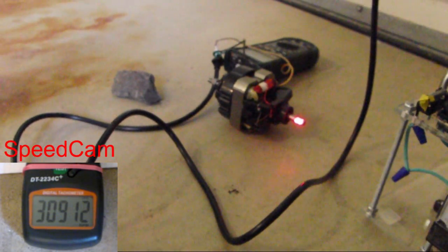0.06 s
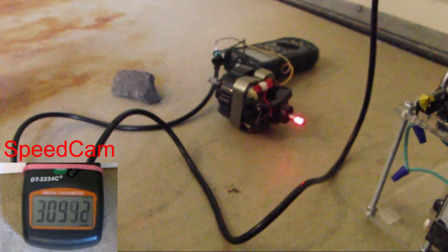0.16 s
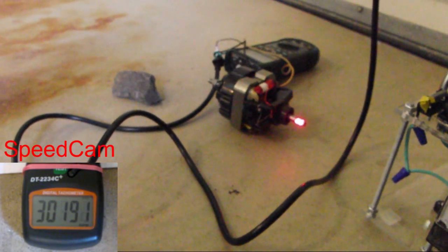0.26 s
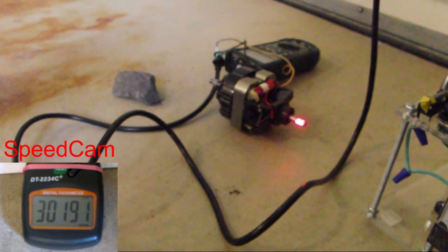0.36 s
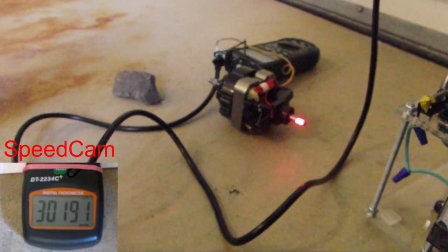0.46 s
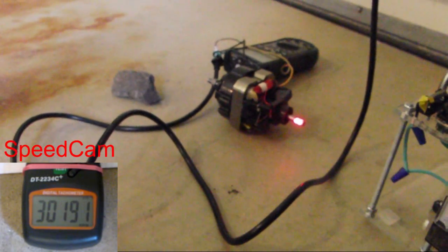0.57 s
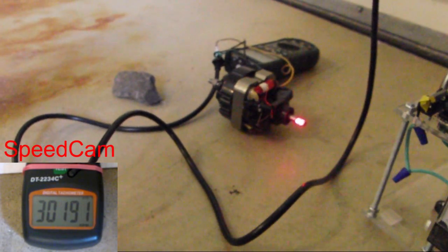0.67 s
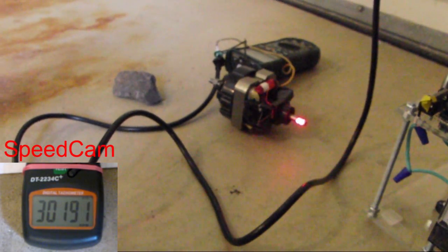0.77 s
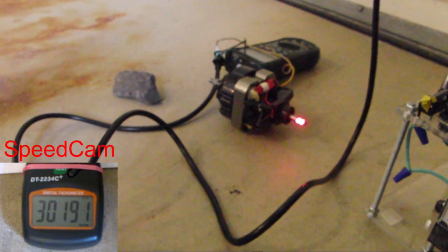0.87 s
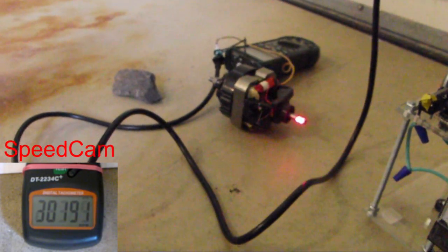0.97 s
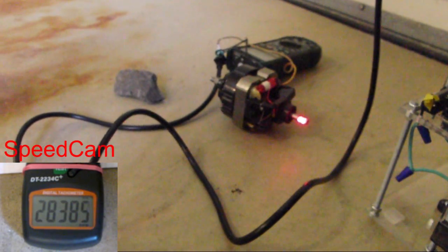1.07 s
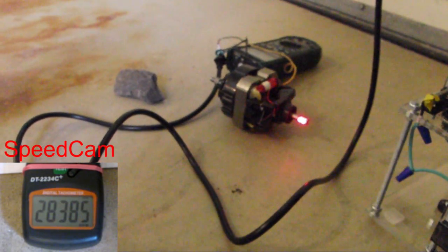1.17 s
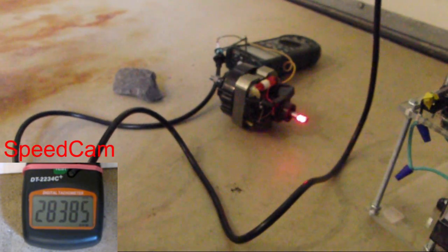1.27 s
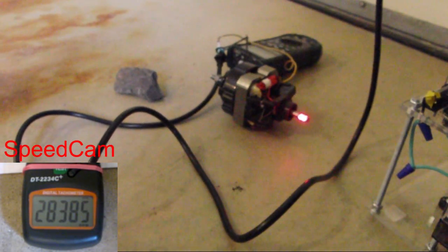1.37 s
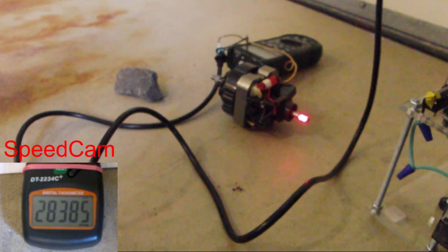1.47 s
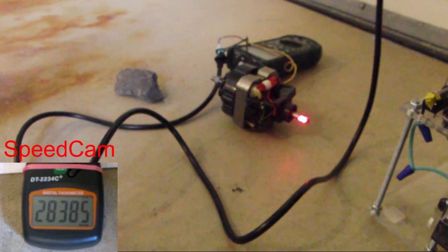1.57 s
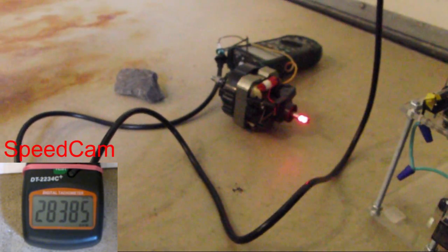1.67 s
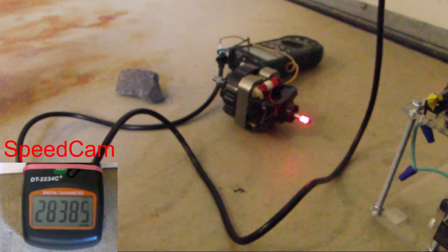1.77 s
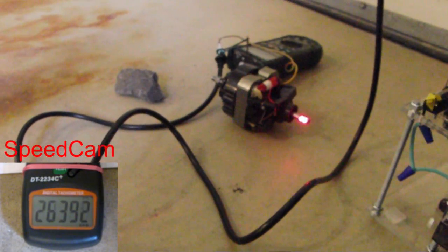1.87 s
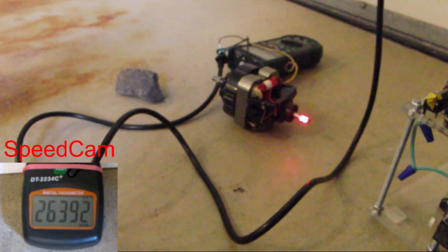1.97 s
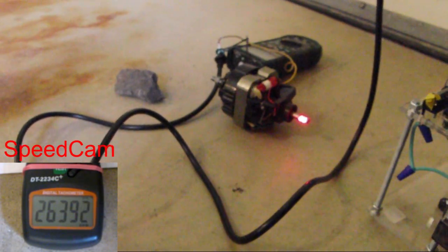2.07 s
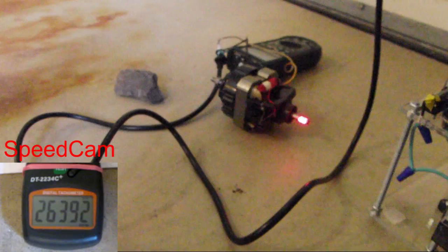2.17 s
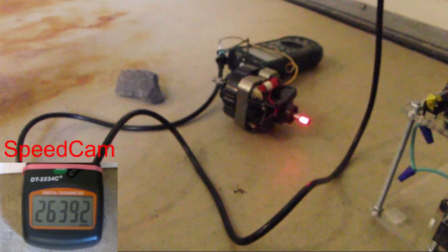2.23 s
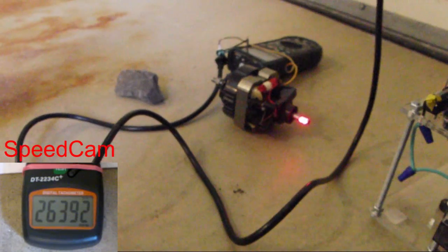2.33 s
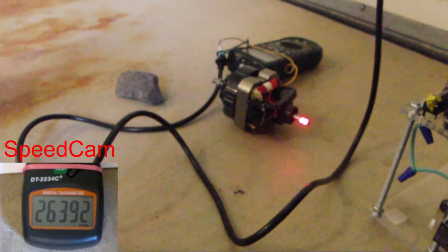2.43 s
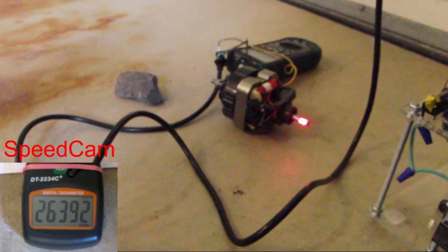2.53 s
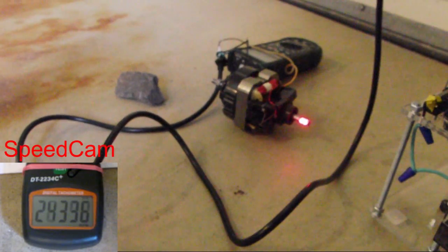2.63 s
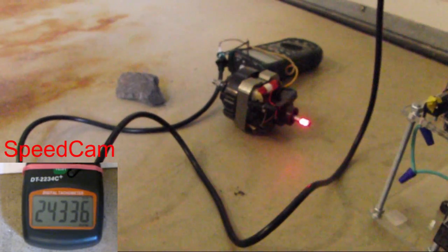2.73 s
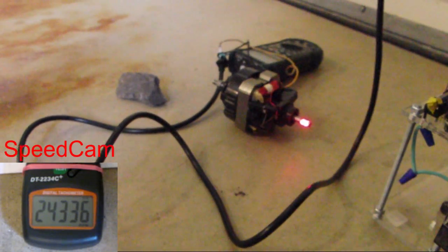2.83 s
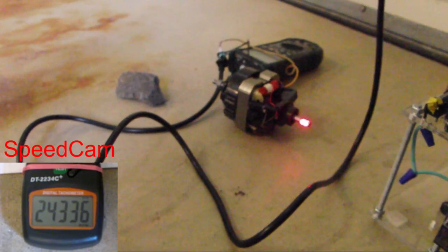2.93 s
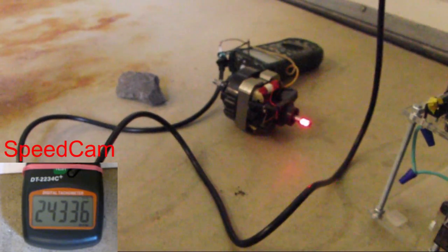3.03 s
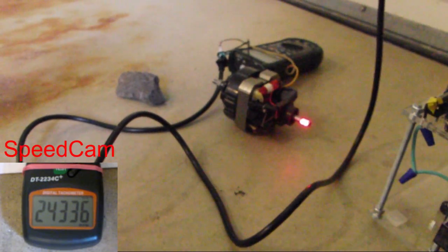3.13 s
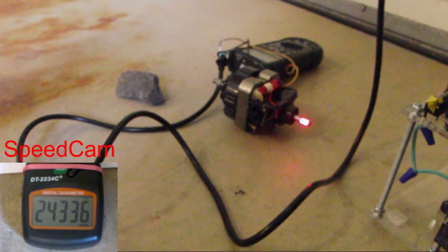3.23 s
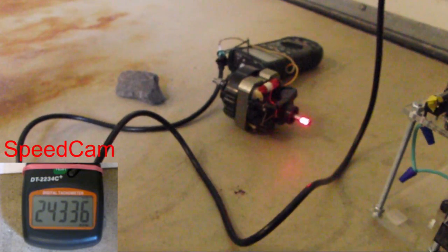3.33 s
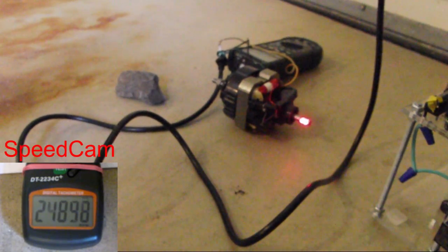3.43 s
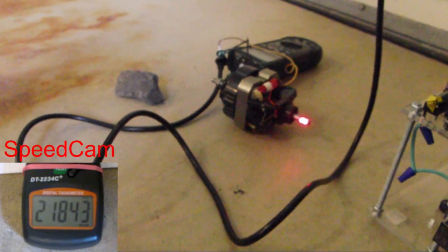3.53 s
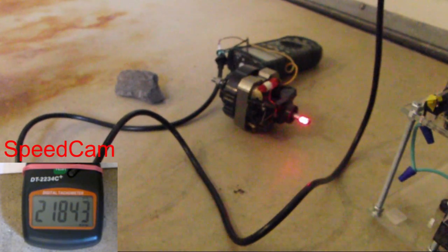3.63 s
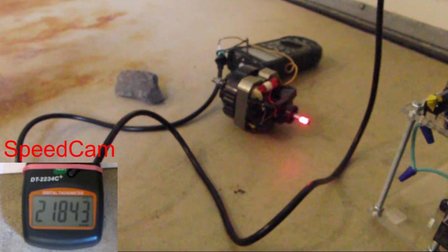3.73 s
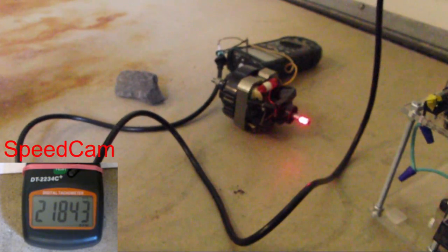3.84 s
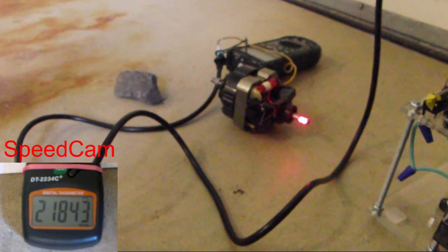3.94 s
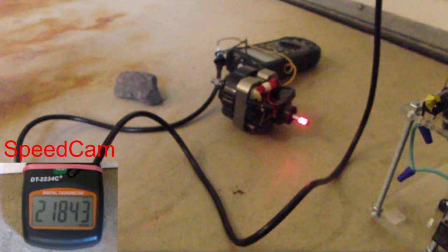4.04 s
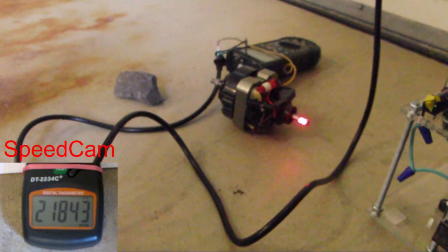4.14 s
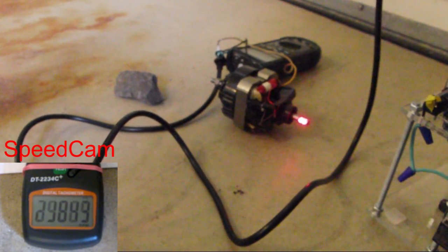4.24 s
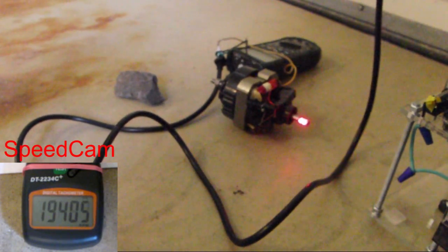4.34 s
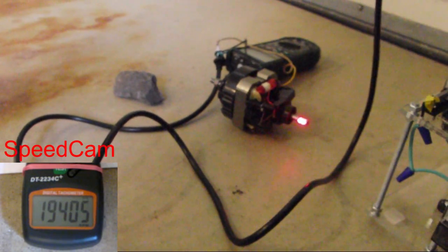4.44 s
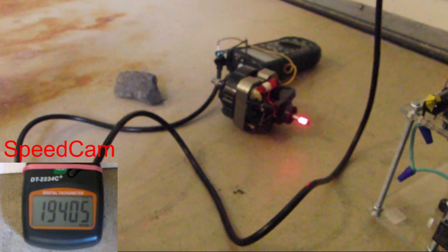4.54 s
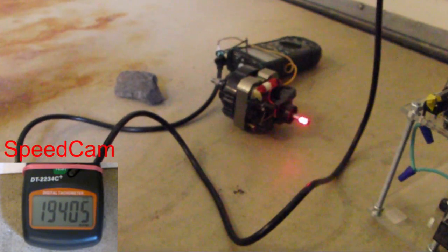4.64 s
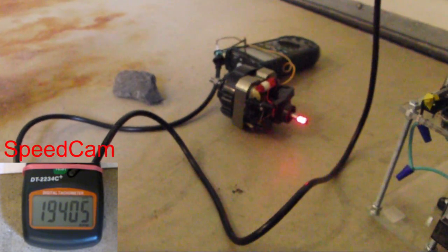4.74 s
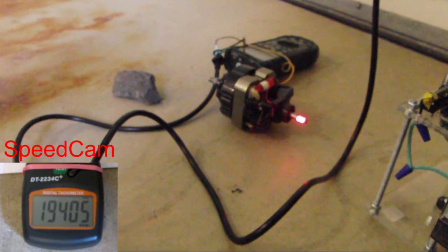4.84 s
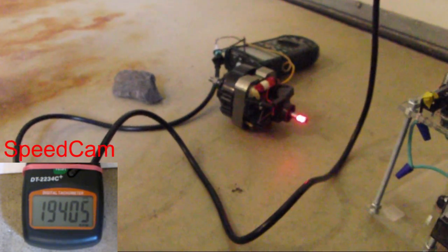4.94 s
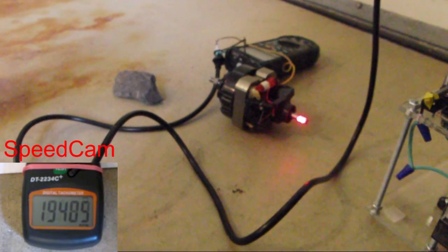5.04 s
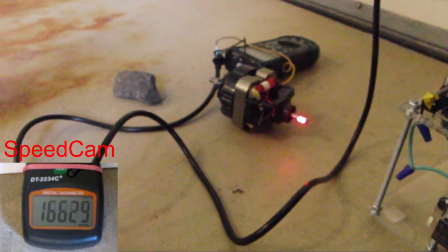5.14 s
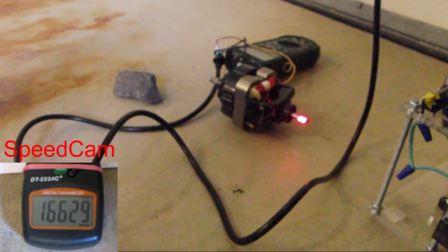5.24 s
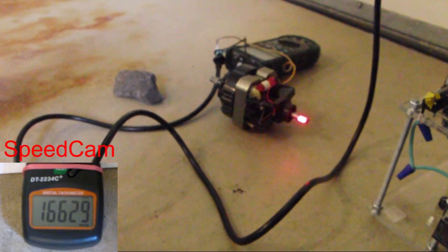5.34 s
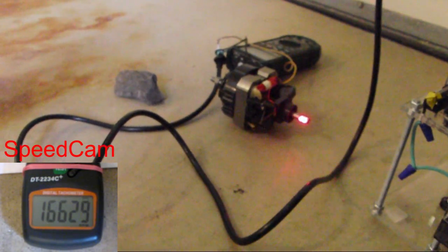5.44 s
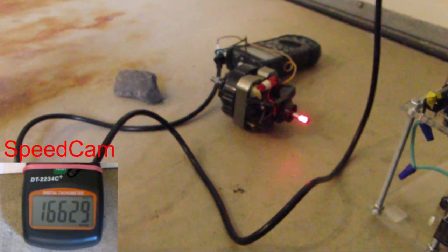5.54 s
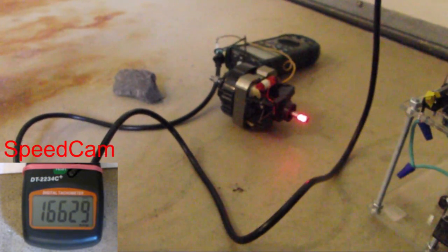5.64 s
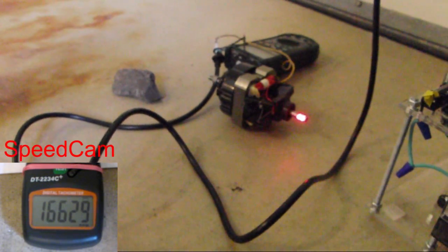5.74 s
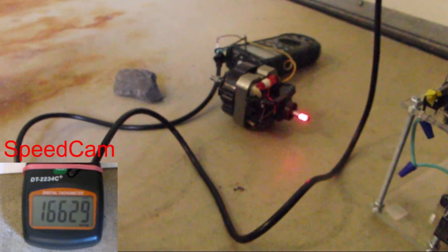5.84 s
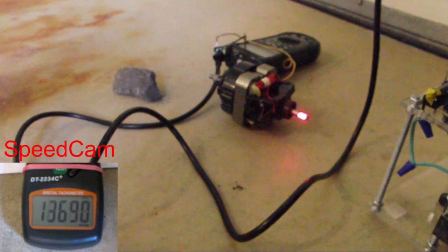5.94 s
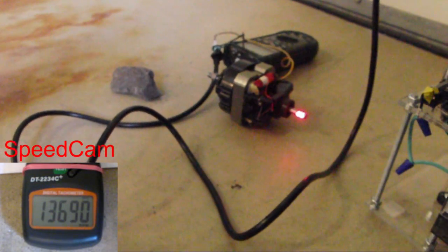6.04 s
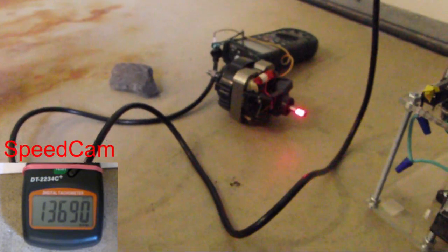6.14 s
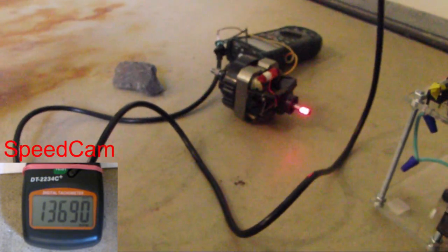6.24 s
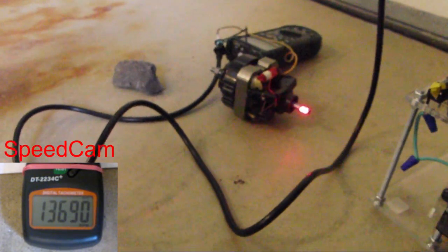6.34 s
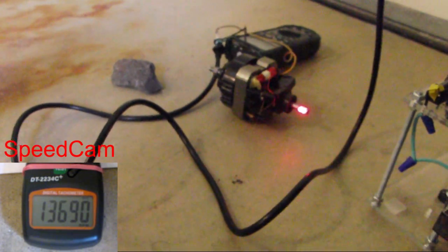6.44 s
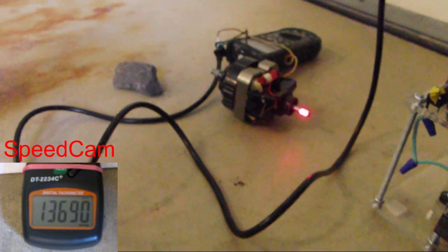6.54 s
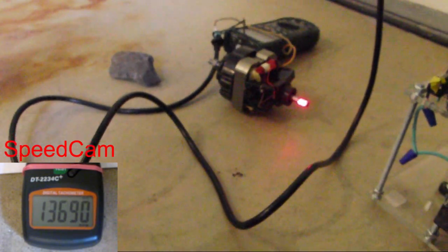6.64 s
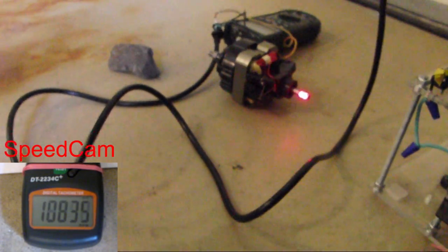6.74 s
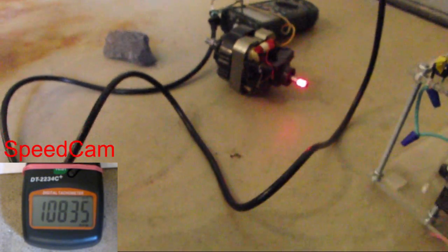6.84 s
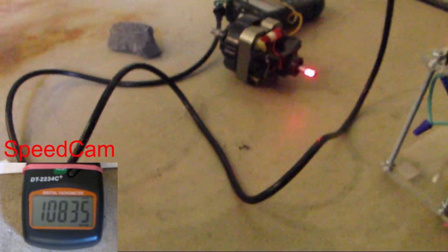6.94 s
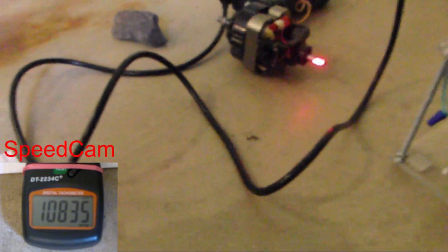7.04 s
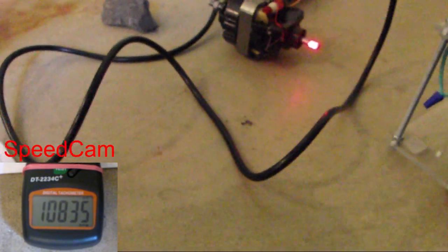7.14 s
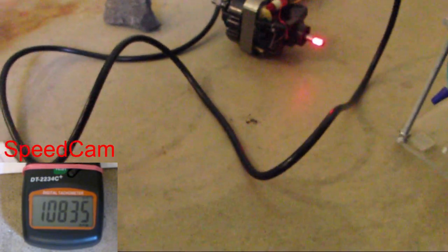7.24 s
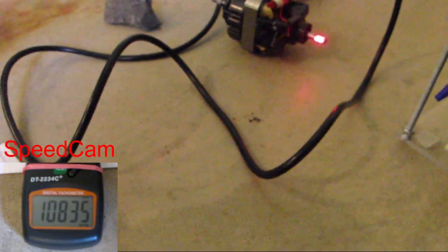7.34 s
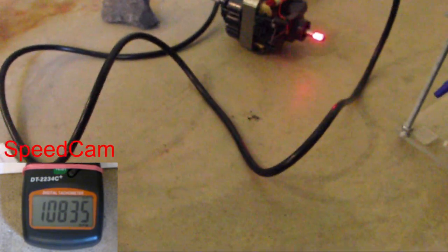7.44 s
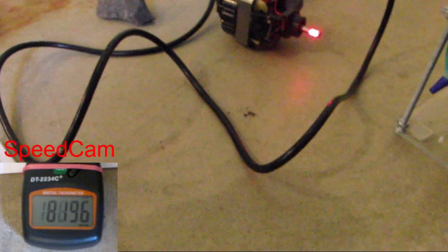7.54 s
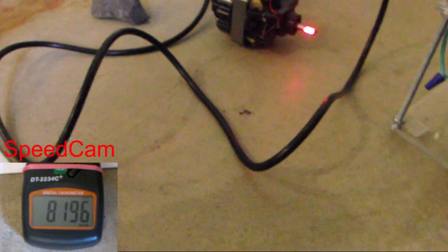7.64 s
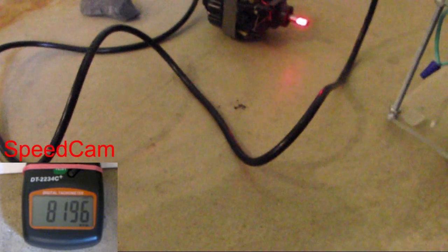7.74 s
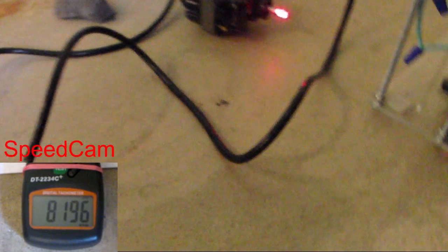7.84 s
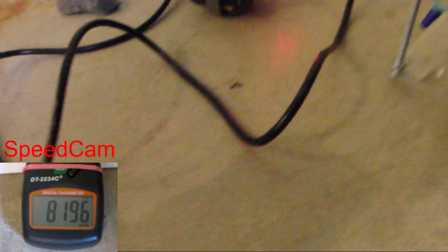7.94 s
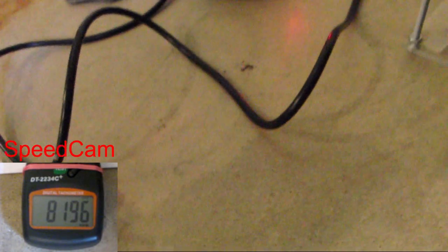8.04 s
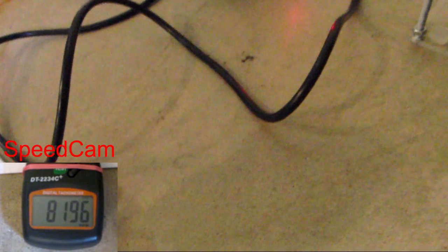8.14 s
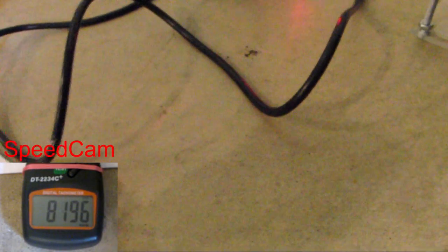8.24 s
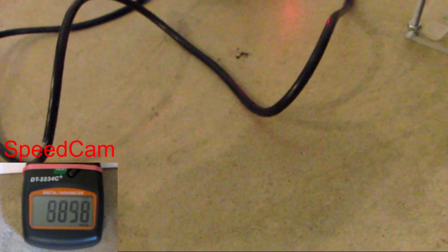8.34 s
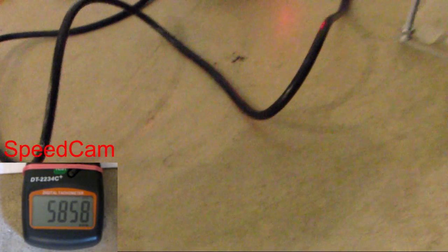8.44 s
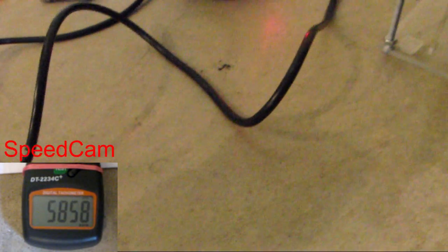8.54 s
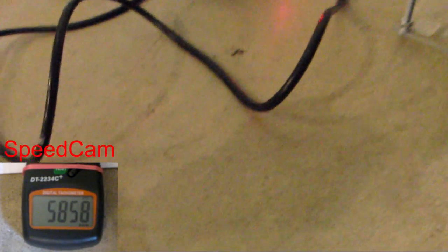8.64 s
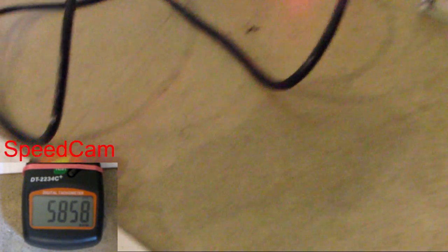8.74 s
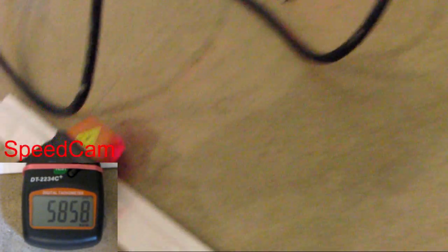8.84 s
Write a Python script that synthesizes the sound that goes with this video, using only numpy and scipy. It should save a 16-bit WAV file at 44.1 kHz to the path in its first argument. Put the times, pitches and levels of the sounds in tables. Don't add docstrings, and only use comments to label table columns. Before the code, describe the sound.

Heard close in mono inside a live room, a tiny motor slows from a shrill scream to a weak whirr. The falling tone flutters and comes and goes in strength, with buzzing overtones, brush hiss and air noise around it. As it quietens, low hum and room noise come up, then small sharp plastic clicks, soft thuds and two brief finger rubs on the microphone.

```python
import sys
import numpy as np
from scipy import signal
from scipy.fft import rfft, irfft, next_fast_len
from scipy.io import wavfile
from scipy.ndimage import uniform_filter1d, map_coordinates

SR = 44100
rng = np.random.default_rng(int(sys.argv[2]) if len(sys.argv) > 2 else 0)


def wav_record(signal):
    frames = np.transpose(np.atleast_2d(signal))
    bounded = np.clip(frames, -1, 1)
    quanta = np.round(bounded * 32767).astype(np.int16)
    wavfile.write(sys.argv[1], SR, quanta)


def boost_factor(decibels):
    exponent = np.asarray(decibels, float) / 20
    return 10 ** exponent


N = 392475
SLOTS, BARS, SPOTS = 12, 16, 60

# time in seconds, speed in turns per second.
SHAFT_SPEED = [(0, 435.3), (0.3, 423), (0.6, 409.1), (1.5, 362.2), (1.8, 348.8), (2.1, 333.8), (2.4, 317.7),
               (3.3, 265.9), (3.9, 228.9), (4.5, 193.4), (5.1, 160.1), (5.7, 128.6), (6.3, 100.3),
               (6.9, 74), (7.2, 61.3), (7.6, 45.8), (8, 33.4), (8.5, 22.6)]
# time in seconds, gain in dB, brush bite in dB.
GAIN_AND_BITE = [(0, -2.5, 10.5), (.4, -0.5, 5.5), (.8, 1, 7), (1.5, 2, 3), (2.4, 4.5, 3), (3.3, 8, 6),
                 (3.9, 8.5, 7), (4.4, 9.5, 5), (5, 10, 5.5), (5.6, 11.5, -0.5), (6.2, 12, 3),
                 (6.55, 13.5, 1.2), (6.8, 14.5, -0.5), (7.2, 14.5, 5), (8.1, 17, 9.3), (8.4, 18, 8),
                 (8.7, 16, 2.5), (8.9, 18.5, -4.5)]
# centre in Hz, width in Hz, peak in dB.
WHINE_PATH = [(1040, 1500, 4.5), (1140, 430, 9.5), (1790, 673, 23.5), (2148, 253, 9.5), (2460, 19, -3),
              (2683, 720, 24.5), (2711, 15, 10), (3416, 40, 11), (3725, 18, -7.0), (3776, 293, 16.5),
              (3990, 31, 5), (4537, 315, 10.5), (4750, 23, 5.2), (4960, 96, 5.5)]
# centre in Hz, width in Hz, gain
# in dB (nulls negative).
NULLS_AND_LIFT = [(1034, 59, -14.6), (1481, 36, -17.5), (1891, 156, -10.7), (2296, 35, -17.4),
                  (2707, 150, -21.5), (2755, 47, -8.9), (3078, 84, -9.4), (3592, 11, -11.6),
                  (3782, 32, -16.3), (3850, 22, -9.4), (4015, 186, -28.7), (4270, 13, -12.4),
                  (4683, 50, -19.1), (5036, 60, -7.8),
                  (560, 300, 9), (1419, 10, -22), (1447, 10, -18), (3295, 14, -22), (3345, 10, -12),
                   (3413, 14, -24), (5165, 12, -12)]
# shaft speed in Hz, level in dB.
UNBALANCE_LEVEL = [(65, -91), (106, -80), (118, -65), (130, -61), (170, -68), (270, -63), (340, -58),
                   (435, -55)]
# multiple of the shaft, level in dB.
LOW_ORDERS = [(2, -14), (5, -11), (6, 0), (7, -12)]
# multiple of the shaft, level in dB.
HIGH_ORDERS = [(24, 0), (22, -9), (32, -3), (36, -1), (42, -4)]
# frequency in Hz, level in dB.
BAR_TONE = [(800, -34), (2000, -21), (5000, -27), (10000, -19), (11500, -8), (12700, 2), (13700, -4),
            (14800, -16)]
# frequency in Hz, level in dB.
SPOT_TONE = [(500, -24), (1400, -11), (2500, -5), (5400, 2), (7000, -5), (9200, 1), (11000, -4), (13200, 1)]
# centre in Hz, width in Hz, peak in dB.
HOLDER_MODES = [(1900, 130, 10), (3000, 250, 5), (3700, 200, 5)]
# centre in Hz, width in Hz, peak in dB.
HOUSING_MODES = [(654, 92, 7), (1165, 230, 7.5), (1701, 220, 11), (2134, 156, 10.5), (2507, 78, 7),
                 (2930, 640, 8), (3924, 420, 10)]
# centre in Hz, width in Hz, peak in dB.
BRUSH_MODES = [(9300, 7900, 9.8), (13200, 1100, 8)]
# frequency in Hz, level in dB.
FAST_AIR_TONE = [(60, -22.5), (250, -17.5), (600, -11.5), (1200, -5), (2200, -1.5), (4000, -6.5),
                 (6000, -9.5), (10000, -6)]
# frequency in Hz, level in dB.
SLOW_AIR_TONE = [(60, -33), (250, -11), (600, -2.5), (1200, -3.5), (2500, -1), (4000, -5.5), (6000, -2),
                 (10000, -21)]
# frequency in Hz, level in dB.
SCRAPE_TONE = [(500, -31.5), (1500, -35), (3500, 7), (5500, -0.5), (7500, -4), (10000, -26)]
# frequency in Hz, level in dB.
HISS_TONE = [(4000, -21), (7000, -5), (9000, 2), (12500, 1), (15000, -12), (16000, 0.5)]
# start in seconds, peak in dB, ring in Hz, ring T60 in seconds, thud in dB.
CASE_TAPS = [(6.7863, -6, 2900, .006, -40), (7.688, -3, 2600, .007, -21), (7.426, -25, 1500, .012, -8),
             (6.855, -22, 2500, .01, -20), (6.935, -25, 2200, .02, -12), (7.025, -22, 2900, .015, -20),
             (6.71, -26, 1250, .03, -20), (7.07, -24, 2000, .02, -20), (7.62, -28, 1500, .015, -8),
             (7.41, -20, 2500, .007, -19), (7.71, -23, 2700, .03, -1), (7.78, -32, 1500, .02, -2),
             (7.815, -30, 2800, .015, -6), (7.983, -25, 2200, .01, -20), (8.364, -29, 1400, .015, 2)]
# start in seconds, length in seconds, level in dB.
FINGER_SLIDES = [
    (6.993, 0.051, -25),
    (7.888, 0.054, -23.5),
]
# frequency in Hz, level in dB.
HUM_PARTIALS = [(111.5, -2.5), (52.7, -18.5), (157, -21), (224, -18.5)]
# frequency in Hz, level in dB.
ROOM_NOISE_TONE = [(15, -54), (25, -20), (113, -14), (173, -14), (716, -27.5), (780, -26), (1070, -30),
                   (2070, -27), (4000, -24), (5200, -64), (8800, -120)]
# frequency in Hz, T60 in seconds.
ROOM_DECAY = [(200, 1), (2000, 1), (12000, 0.77)]
# centre in Hz, width in Hz, depth in dB.
PORT_NOTCHES = [(4023, 163, -19.5), (6277, 670, -14), (7850, 860, -11), (10215, 560, -13.5)]
# bottom in Hz, top in Hz, threshold in dB.
GATED_TREBLE = [(15200, 15800, -51.5), (14450, 15300, -63.5)]


def whine(turns, speed):
    slow_echo = 0.22 * (wobble(28) + 1j * wobble(28))
    quick_echo = 0.12 * (wobble(90) + 1j * wobble(90))
    tone = np.imag((1 + slow_echo + quick_echo) * np.exp(2j * np.pi * SLOTS * turns))
    level_db = speed_law(speed, -30, 3.13) + curves(GAIN_AND_BITE)[0]
    path = bumps(WHINE_PATH + NULLS_AND_LIFT, SLOTS * speed)
    return boost_factor(level_db) * path * unit(tone)


def orders(turns, speed):
    crawl_speed = 55
    gain_db = curves(GAIN_AND_BITE)[0] - 20 * np.log10(1 + (crawl_speed / speed) ** 4)
    unbalance = sines(turns, [(1, 0)], gain_db + along(UNBALANCE_LEVEL, speed))
    low = sines(turns, LOW_ORDERS, gain_db + speed_law(speed, -33, 3.3))
    high = sines(turns, HIGH_ORDERS, gain_db + speed_law(speed, -50.5, 0.75))
    line_gain = SR / (np.sqrt(2) * speed)
    return unbalance + low + high + bar_clicks(turns, speed, gain_db, line_gain) + \
        spot_clicks(turns, speed, gain_db, line_gain)


def bar_clicks(turns, speed, gain_db, line_gain):
    clicks = ticks(turns, np.arange(BARS) / BARS, np.ones(BARS), scatter=0.15) * line_gain / BARS
    level_db = gain_db + speed_law(speed, -30, 1.85) + 1.5 * wobble(6)
    return coloured(boost_factor(level_db) * clicks, BAR_TONE)


def spot_clicks(turns, speed, gain_db, line_gain):
    tracks, drift = 3, 0.8
    share = np.array([wobble(drift) for _ in range(tracks)])
    share = share / np.linalg.norm(share, axis=0)
    clicks = np.zeros(N)
    for part in share:
        angles = np.sort(rng.random(SPOTS))
        signs = np.sign(rng.standard_normal(SPOTS))
        clicks += part * ticks(turns, angles, signs, scatter=0.15)
    level_db = gain_db + speed_law(speed, -50.5, 1.15) + 1.5 * wobble(4)
    return coloured(boost_factor(level_db) * clicks * line_gain / np.sqrt(SPOTS), SPOT_TONE, HOLDER_MODES)


def rotor_noise(speed):
    gain_db, bite_db = curves(GAIN_AND_BITE)
    hiss_db = gain_db + bite_db + speed_law(speed, -36, 1.326)
    air_db = power_sum(gain_db + speed_law(speed, -21, 2.446), hiss_db - 6)
    scrape_db = power_sum(speed_law(speed, -32.5, 2.9), hiss_db + speed_law(speed, -17.5, 0.43))
    shake_db = 0.42 * wobble(7.2) + 0.087 * wobble(60)
    slow = np.clip((260 - speed) / 190, 0, 1)
    fast_air = unit(coloured(patchy(1.0), FAST_AIR_TONE, HOUSING_MODES))
    slow_air = unit(coloured(patchy(1.0), SLOW_AIR_TONE, HOLDER_MODES))
    air = boost_factor(air_db + shake_db) * (np.sqrt(1 - slow) * fast_air + np.sqrt(slow) * slow_air)
    scrape = boost_factor(scrape_db + 5 + shake_db) * unit(coloured(patchy(2.2), SCRAPE_TONE))
    hiss = boost_factor(hiss_db + 1.2 * shake_db) * unit(coloured(patchy(1.0), HISS_TONE, BRUSH_MODES))
    return air + scrape + hiss


def taps():
    ring_partials = [(0.97, 0.76), (0.606, 0.43), (1.36, 0.55), (1.8, 0.15)]
    case_modes = [(240, 0.59), (350, 0.3), (480, 0.45), (780, 0.28), (1050, 0.27), (1700, 0.21)]  # (Hz, gain)
    out, t = np.zeros(N + SR), np.arange(SR // 8) / SR
    case = sum(gain * np.sin(2 * np.pi * hz * t) for hz, gain in case_modes)
    attack = 1 - np.exp(-t / 0.00057)
    for start, db, ring_hz, t60, thud_db in CASE_TAPS:
        ring = sum(gain * np.sin(2 * np.pi * ring_hz * ratio * t) for ratio, gain in ring_partials)
        thud = boost_factor(thud_db - 60 * t / 0.05) * case
        out[round(start * SR):][:len(t)] += boost_factor(db - 1.0) * attack * (boost_factor(-60 * t / t60) * ring + thud)
    return out[:N]


def slides():
    skin = [(900, -22), (1500, -10), (2800, -7), (7000, -14), (15500, -2.5)]  # (Hz, dB)
    t, gate = np.arange(N) / SR, np.zeros(N)
    for start, length, db in FINGER_SLIDES:
        gate += boost_factor(db) * np.sin(np.pi * np.clip((t - start) / length, 0, 1))
    return gate * unit(coloured(rng.standard_normal(N), skin))


def background():
    gain_db = curves(GAIN_AND_BITE)[0]
    t, hum = np.arange(N) / SR, np.zeros(N)
    for hz, db in HUM_PARTIALS:
        hum += boost_factor(db + 1.8 * wobble(3.03)) * np.sin(2 * np.pi * hz * t + 0.23 * wobble(2.33))
    room_noise = unit(coloured(rng.standard_normal(N), ROOM_NOISE_TONE))
    return np.sqrt(2) * boost_factor(-67 + 1.45 * gain_db) * hum + boost_factor(-65 + 0.48 * gain_db + 5.5) * room_noise


def room(x):
    hz, t, z = signal.stft(rng.standard_normal(SR // 2), SR, nperseg=256)
    decay = boost_factor(-60 * t / along(ROOM_DECAY, hz)[:, None])
    tail = signal.istft(z * decay, SR, nperseg=256)[1]
    delayed = np.pad(x, (400, 0))
    return signal.fftconvolve(delayed, tail / np.linalg.norm(tail))[:N]


def ticks(turns, angles, sizes, scatter):
    when = (np.arange(int(turns[-1]))[:, None] + angles).ravel()
    at = np.interp(when, turns, np.arange(N))
    size = np.resize(sizes, len(at)) * (1 + scatter * rng.standard_normal(len(at)))
    cell = at.astype(int)[:, None] + np.arange(-7, 9)
    offset = cell - at[:, None]
    pulse = size[:, None] * np.sinc(offset) * np.cos(np.pi * offset / 16) ** 2
    return np.bincount(np.clip(cell, 0, N).ravel(), pulse.ravel(), N + 1)[:N]


def sines(turns, table, level_db):
    out = np.zeros(N)
    for multiple, db in table:
        phase = 2 * np.pi * multiple * turns + 0.4 * wobble(15)
        out += boost_factor(db + 2 * wobble(8)) * np.sin(phase)
    return np.sqrt(2) * boost_factor(level_db) * out


def speed_law(speed, full_db, slope):
    return full_db + slope * 20 * np.log10(speed / 400)


def power_sum(a_db, b_db):
    return 10 * np.log10(boost_factor(2 * a_db) + boost_factor(2 * b_db))


def patchy(depth_db):
    z = signal.stft(rng.standard_normal(N + 512), nperseg=512)[2]
    field = uniform_filter1d(rng.standard_normal(z.shape), 8, 0)
    field = uniform_filter1d(field, 8, 1)
    return signal.istft(z * boost_factor(depth_db * unit(field)), nperseg=512)[1][:N]


def coloured(x, points, modes=()):
    m = next_fast_len(N + 8192)
    hz = np.fft.rfftfreq(m, 1 / SR)
    return irfft(rfft(x, m) * boost_factor(along(points, hz)) * bumps(modes, hz), m)[:N]


def bumps(modes, hz):
    return boost_factor(sum(db / (1 + (2 * (hz - centre) / width) ** 2) for centre, width, db in modes))


def along(points, hz):
    f, v = np.transpose(points)
    return np.interp(np.log(hz + 1), np.log(f + 1), v)


def curves(rows):
    seconds, *columns = np.transpose(rows)
    return [np.interp(np.arange(N) / SR, seconds, column) for column in columns]


def wobble(rate):
    knots = rng.standard_normal(int(N * rate / SR) + 4)
    return map_coordinates(knots, [np.arange(N) * rate / SR])


def unit(x):
    return x / np.sqrt(np.mean(x ** 2) + 1e-20)


def scene():
    speed = uniform_filter1d(curves(SHAFT_SPEED)[0], SR // 4)
    turns = np.cumsum(speed) / SR
    tones, slot = orders(turns, speed), whine(turns, speed)
    motor = 0.9 * tones + boost_factor(-7) * room(tones)
    broad = motor + rotor_noise(speed) + taps() + slides() + background()
    mono = coloured(broad, [(1, 0)], PORT_NOTCHES) + slot + boost_factor(-18) * room(slot)
    return np.array([mono, mono])


def band_limit(x):
    return signal.sosfilt(signal.butter(12, 15700, fs=SR, output="sos"), x)


def record(dry):
    kept = coloured(dry[0], [(15700, 0), (15730, -120)])
    for low_hz, high_hz, faint_db in GATED_TREBLE:
        top = coloured(kept, [(low_hz - 30, -120), (low_hz, 0), (high_hz, 0), (high_hz + 30, -120)])
        faint = uniform_filter1d(top ** 2, 1024) < boost_factor(faint_db) ** 2
        kept = kept - uniform_filter1d(1.0 * faint, 512) * top
    return band_limit(np.array([kept, kept]))


dry = scene()
out = record(dry)
wav_record(out)
```